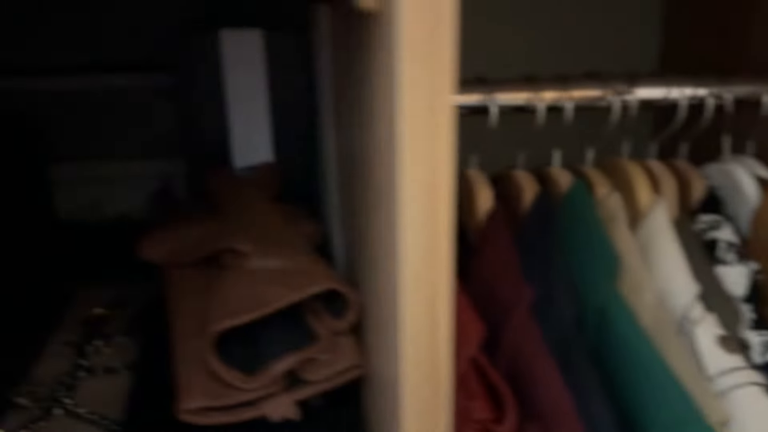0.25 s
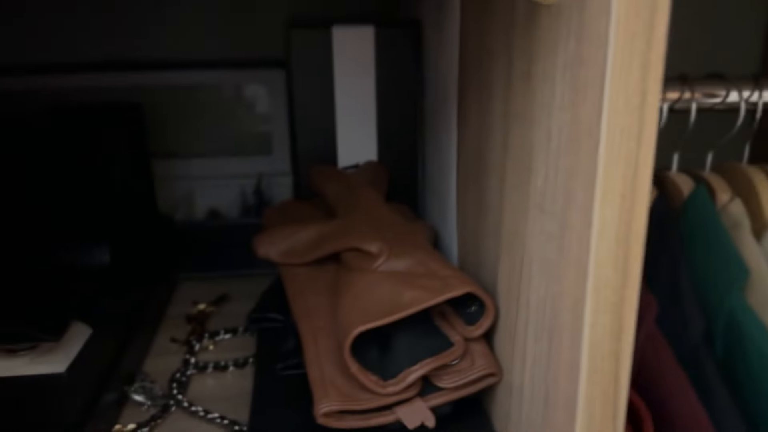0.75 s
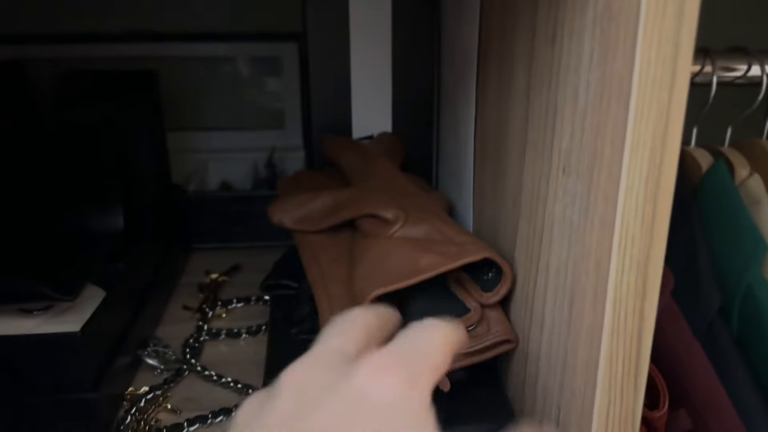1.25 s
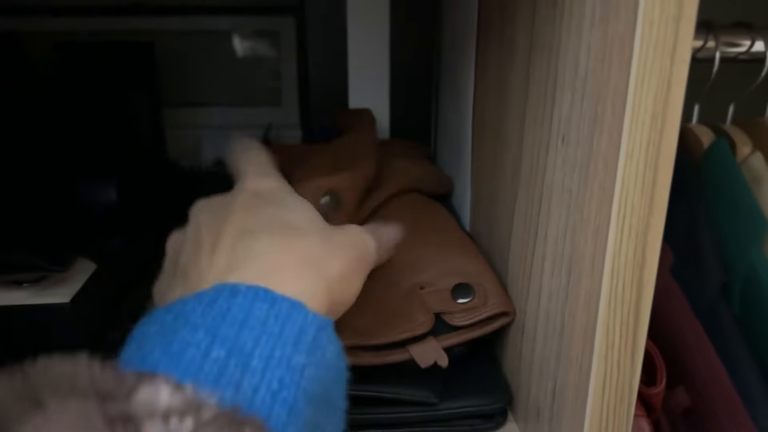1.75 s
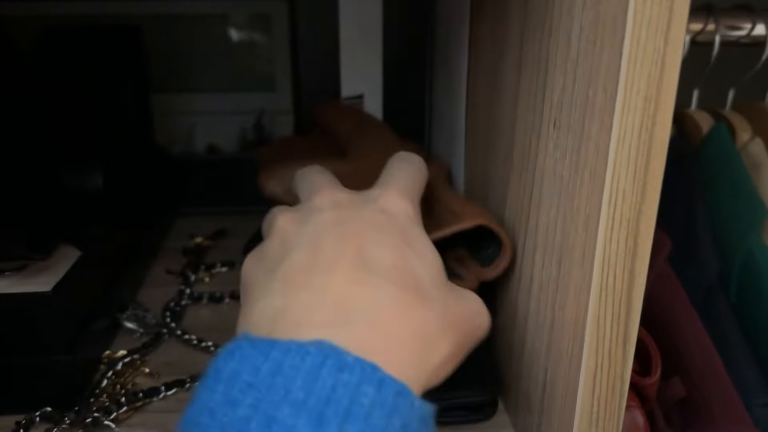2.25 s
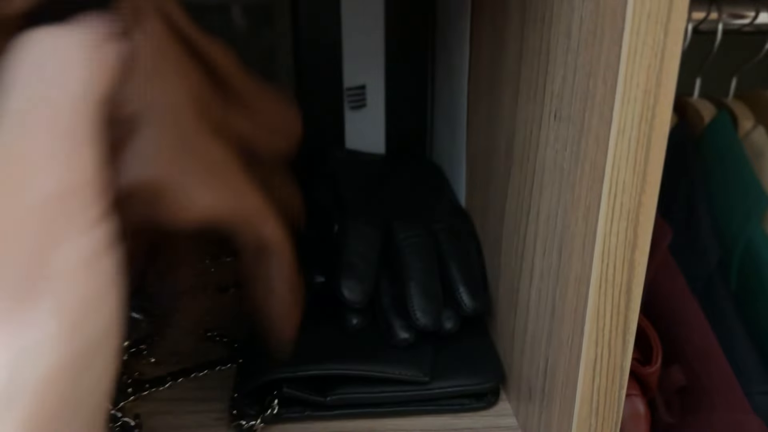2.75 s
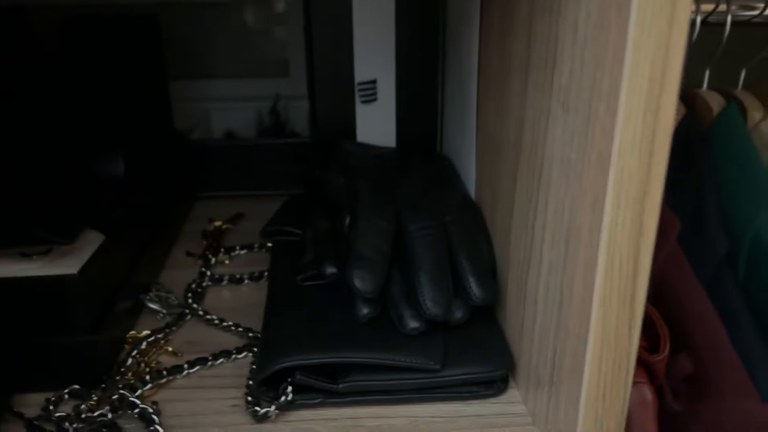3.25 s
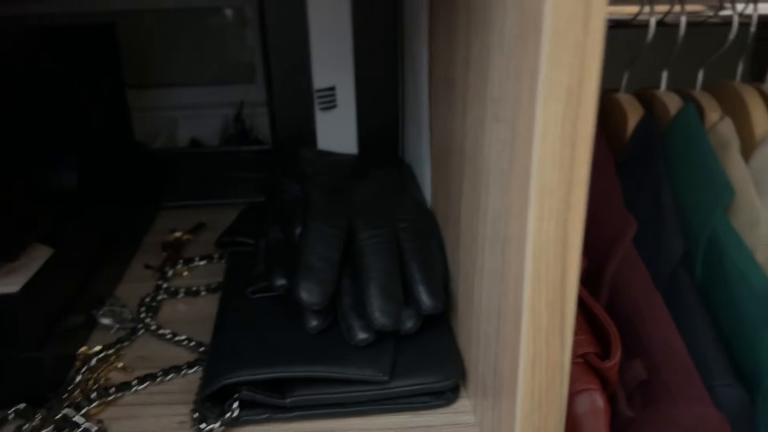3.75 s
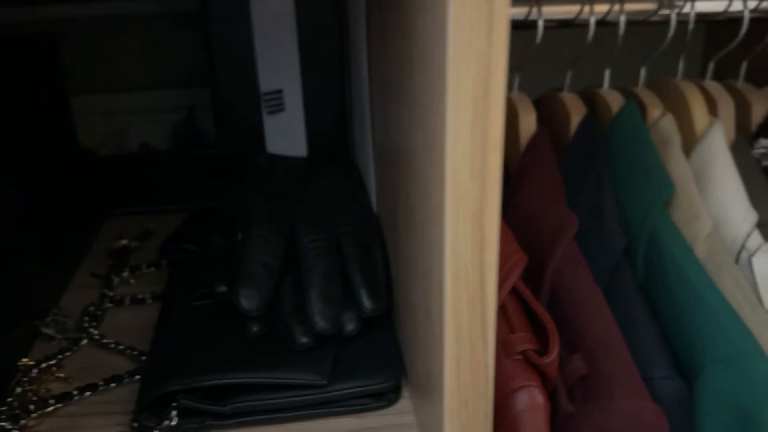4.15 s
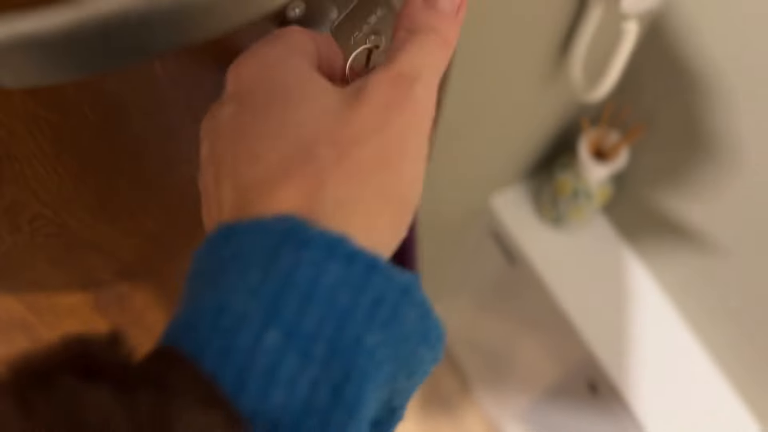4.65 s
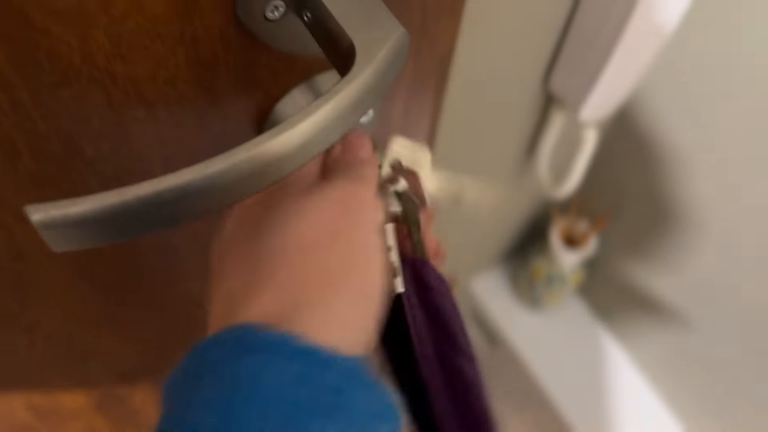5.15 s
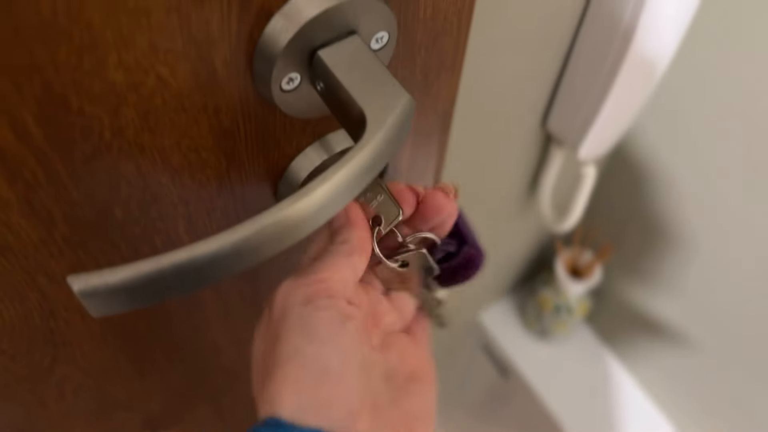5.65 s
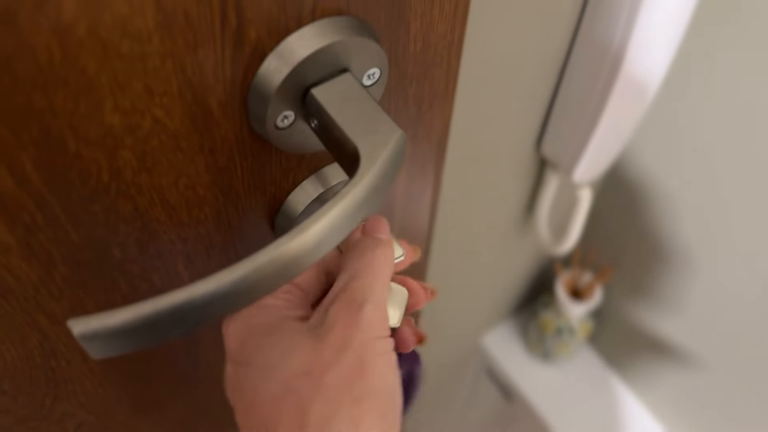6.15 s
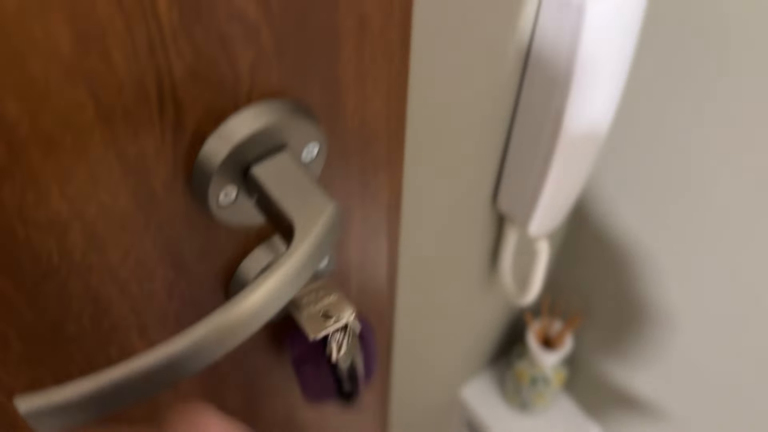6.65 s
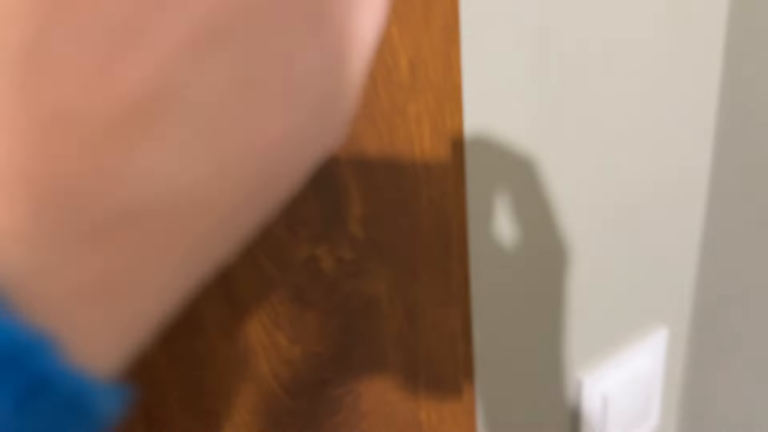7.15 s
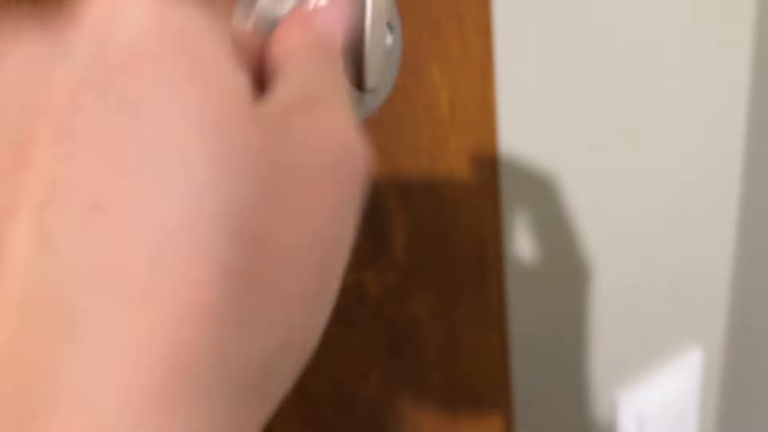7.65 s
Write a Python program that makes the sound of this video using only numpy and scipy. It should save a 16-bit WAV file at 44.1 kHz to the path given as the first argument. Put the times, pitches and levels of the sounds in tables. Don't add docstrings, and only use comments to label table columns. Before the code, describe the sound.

Close handheld stereo, indoors. From 0 to 0.9 s a wardrobe door rolls open with low, uneven rumble, rattling guide ticks and a jolt at 0.14, dying away as it stops. A faint ratchet ticks about eleven times a second from 0.9 to 2.1, fading. Leather rustles softly among small shelf knocks, brighter at 1.6; a sharp metal stud snaps at 2.09 and a short hard wood knock follows at 2.5. Rustling swells around 3.1, a scuff comes at 3.4, and the door rumbles shut from 3.8, growing until an abrupt cut at 4.48. In a lightly reverberant hallway, keys click from 4.65, then jangle densely and brightly between 5.05 and 5.65, with high ringing and brass rubbing. Sparser scrapes, clicks and door thuds follow; a bright clash at 6.5 leads to tiny spring pings until 6.8. Bolts clack from 7.1, strongest at 7.48, with final clicks near 7.85.

```python
import sys
import numpy as np
from scipy import signal
from scipy.fft import rfft, irfft, next_fast_len
from scipy.io import wavfile
from scipy.ndimage import uniform_filter1d, map_coordinates

SR = 44100
rng = np.random.default_rng(int(sys.argv[2]) if len(sys.argv) > 2 else 0)


def volts(x):
    e = np.asarray(x, float) / 20
    return 10 ** e


def file_out(sig):
    cols = np.atleast_2d(sig).T
    lim = np.clip(cols, -1, 1)
    pcm = np.round(lim * 32767).astype(np.int16)
    wavfile.write(sys.argv[1], SR, pcm)


N = 348831
T = np.arange(N) / SR
CUT_S = 4.475

# [f/Hz, level/dB, t60/s]
SHELF_TONES = [(102.2, -4.5, 0.24), (158.3, -1.5, 0.12), (288, -1.5, 0.045), (429, 8.5, 0.028),
               (880, 4, 0.013)]
# [f/Hz, level/dB, t60/s]
DOOR_TONES = [(76.8, -17.5, 0.6), (145.3, 0.5, 0.11), (278, -7.5, 0.38), (444, -3, 0.15), (590, -2, 0.084),
              (929, 7, 0.031)]
# [f/Hz, level/dB]
CRACK_COLOUR = [(200, -29.5), (900, -3), (2200, -3.5), (4000, 0.5), (6500, 0), (9500, 2), (12500, 4),
                (16000, -13)]
# [f/Hz, level/dB]
CLOTH_COLOUR = [(1200, -26), (2200, -2), (3500, -0.5), (6000, -8.5), (9500, -11.5), (16000, -27.5)]
# [f/Hz, level/dB]
BRASS_COLOUR = [(500, -46), (1200, -3), (2500, -5), (5000, -6.5), (8000, -5), (11000, -5), (13500, -27),
                (16000, -24)]
# [f/Hz, level/dB]
BODY_COLOUR = [(30, -33), (70, 5), (140, 0), (300, -2), (600, -6.5), (1200, -11.5), (2500, -38.5),
               (15000, -72)]


def unit(x):
    return x / np.sqrt(np.mean(x ** 2) + 1e-20)


def rise(t, rise_s):
    return 1 - np.exp(-t / rise_s)


def fade(t, t60):
    return volts(-60 * t / t60)


def along(points, hz, axis=1):
    p = np.transpose(points)
    return np.interp(np.log(hz + 1), np.log(p[0] + 1), p[axis])


def curve(*tables):
    return np.interp(T, *np.transpose(np.vstack(tables)))


def wobble(rate):
    return map_coordinates(rng.standard_normal(int(N * rate / SR) + 4), [T * rate])


def filtered(x, response):
    n = x.shape[-1]
    m = next_fast_len(n + 2048)
    return irfft(rfft(x, m) * response(np.fft.rfftfreq(m, 1 / SR)), m)[..., :n]


def noise(spectrum, grain_db, size=N):
    grain = volts(grain_db * rng.exponential(size=size))
    raw = rng.standard_normal((2, size)) * grain
    return unit(filtered(raw, lambda hz: volts(along(spectrum, hz))))


def ring(modes, scatter_db, t, damp=1, struck=False):
    hz, db, t60 = np.transpose(modes)[:, :, None]
    gain = volts(db + scatter_db * rng.standard_normal(hz.shape)) * fade(t, damp * t60)
    start = rng.random((2, len(hz), 1))
    if struck:
        start[0] = 0
    return (gain * np.sin(2 * np.pi * (hz * t + start))).sum(1)


def add(x, s, y):
    part = x[:, round(s * SR):][:, :y.shape[1]]
    part += y[:, :part.shape[1]]


def resonances(peaks):
    def response(f):
        total = 0
        for k, (centre, width, db) in enumerate(peaks):
            drag = 1j * f * width
            total = total + (-1) ** k * volts(db) * drag / (centre * centre - f * f + drag)
        return total
    return response


def knocks(rows, wood, crack_db, thud_db, ring_db, tilt, follow, body=None, body_db=0):
    out, t = np.zeros((2, N)), np.arange(SR // 7) / SR
    for s, db, low_db, t60, hz in rows:
        octave_db = tilt + follow * np.log2(hz / 1500)
        colour = [(f, g + octave_db * np.log2(f / 2000)) for f, g in CRACK_COLOUR]
        decay = fade(t, np.clip(t60, .01, .25)) * rise(t, 0.001) ** 2 * (1 + 1.44 * np.exp(-t / 0.0029))
        crack = volts(crack_db) * noise(colour, grain_db=1.6, size=len(t))
        crack = crack + volts(ring_db) * ring([(hz, 0, .06), (1.05 * hz, -3, .06)], 1, t)
        if body:
            seated = np.array(body) * rng.normal(1, [.04, 0, .2], (len(body), 3))
            crack = crack + volts(body_db) * ring(seated, 4, t)
        thud = volts(low_db + thud_db) * rise(t, 0.0039) ** 2 * ring(wood, 5.0, t)
        add(out, s, volts(db) * decay * crack + thud)
    return out


def slides(rows, surface):
    out, t = np.zeros((2, N)), np.arange(SR // 4) / SR
    for s, db, rise_s, t60 in rows:
        stroke = rise(t, rise_s) ** 2 * noise(surface, grain_db=1.5, size=len(t))
        add(out, s, volts(db) * fade(t, t60) * stroke)
    return out * volts(1.7 * wobble(80))


def hands(effort, surface, grain_db, stir_db, body_db, grows, snag_db):
    effort_db = curve(effort)
    stir = wobble(30)
    snags = snag_db * np.clip((effort_db + 65) / 10, 0, 1) * wobble(170)
    rustle = unit(volts(stir_db * stir + snags) * noise(surface, grain_db))
    body = unit(volts(3.0 * stir + 0.33 * wobble(37)) * noise(BODY_COLOUR, grain_db=0.5))
    return volts(effort_db + 2.5) * rustle + volts(grows * (effort_db + 59) + body_db) * body


def wardrobe_door():
    # [t/s, speed/dB]
    roll = [
        [(0.0, -36), (0.2, -36.5), (0.504, -42.5), (0.692, -54.5), (0.87, -72.5), (0.95, -81)],
        [(3.72, -60), (3.82, -55), (3.936, -45.5), (4.1, -40.5), (4.3, -39), (4.47, -35.5)],
    ]
    # [f/Hz, width/Hz, level/dB]
    panel = [(55.6, 21, -6), (81.9, 9.9, 4), (133.2, 17.5, -2.5), (218, 23, -14), (366.3, 31, -14)]
    # [f/Hz, level/dB]
    roller_colour = [(150, -48), (350, 21.5), (700, -9.5), (1300, 3.5), (2000, -28), (5000, -41),
                     (9000, -72), (16000, -92)]
    # [f/Hz, level/dB]
    swish_colour = [(1200, 4), (3000, 0.5), (6000, -11), (12000, -21)]
    speed_db = curve(roll[0], [(1.2, -101), (3.4, -106)], roll[1])
    bumps = wobble(28.04)
    rumble = unit(volts(2.5 * bumps) * filtered(rng.standard_normal((2, N)), resonances(panel)))
    rollers = unit(volts(1.4 * bumps + 0.9 * wobble(40)) * noise(roller_colour, grain_db=3.0))
    drag = unit(volts(0.88 * wobble(30)) * noise(BODY_COLOUR, grain_db=2.5))
    swish = volts(-32 + 2.9 * wobble(60)) * noise(swish_colour, grain_db=2.0)
    grip = volts(0.47 * (speed_db + 34.5))
    layers = rumble + grip * (volts(-11) * rollers + volts(-8.5) * drag)
    return volts(speed_db) * layers + volts(0.7 * speed_db) * swish


def door_guides():
    # [t/s, peak level/dB, ring f/Hz]
    chatter = [(0.0243, -45, 2240), (0.054, -45.5, 3930), (0.0935, -44.5, 3890), (0.1455, -37.5, 2730),
               (0.2635, -48, 3940), (0.289, -51, 3070), (0.3411, -62, 3240), (0.364, -56, 3880),
               (0.38, -52, 2960), (0.4274, -55.5, 3270), (0.455, -55, 3300), (0.4953, -63, 2980),
               (0.5302, -55, 2960), (0.5891, -53.5, 3640), (0.604, -51, 2900), (0.634, -48.5, 3130),
               (0.663, -49, 2920)]
    out, t = np.zeros((2, N)), np.arange(2000) / SR
    for s, db, hz in chatter:
        rattle = 0.405 * fade(t, 0.15) * noise(CLOTH_COLOUR, grain_db=-10, size=2000)
        add(out, s, volts(db) * rise(t, 0.00065) * (ring([(hz, 0, .035)], 0, t) + rattle))
    return out


def bare_wood_knocks():
    # [t/s, peak level/dB, thud level/dB, t60/s, ring f/Hz]
    stops = [
        (0.141, -38, -61, 0.1, 2390),
        (1.635, -34.5, -69, 0.033, 1000),
        (2.351, -50, -57, 0.14, 694),
        (2.517, -27, -43.5, 0.012, 840),
    ]
    return knocks(stops, SHELF_TONES, crack_db=-5.5, thud_db=-6.5, ring_db=-7.0, tilt=-9, follow=2.0)


def edge_scuffs():
    # [t/s, level/dB, rise/s, t60/s]
    scuffs = [
        (0.143, -40.5, 0.0014, 0.27),
        (3.434, -46, 0.0011, 0.34),
    ]
    # [f/Hz, level/dB]
    edge_colour = [(600, -14.5), (1500, -1), (2050, -1), (2450, -10), (3000, -0.5), (4500, -15),
                   (16000, -54)]
    return slides(scuffs, edge_colour)


def cloth_brushes():
    # [t/s, level/dB, rise/s, t60/s]
    brushes = [
        (.585, -60.5, 0.027, 0.65),
        (.805, -53.5, 0.0097, 0.26),
        (1.76, -59, 0.026, .4),
    ]
    return slides(brushes, CLOTH_COLOUR)


def leather_gloves():
    # [t/s, effort/dB]
    effort = [(0.79, -84), (1.2, -73), (1.5, -67), (1.95, -67.5), (2.31, -68), (2.61, -70), (2.9, -62.5),
              (3.05, -55.5), (3.14, -55), (3.21, -65.5), (3.36, -71.5), (3.62, -75.5), (4.4, -94)]
    # [f/Hz, level/dB]
    leather_colour = [(500, -14.5), (1200, -1), (2500, -5), (4500, -4), (8000, -4.5), (12000, -8.5),
                      (16000, -22.5)]
    return hands(effort, leather_colour, grain_db=-3.0, stir_db=2.0, body_db=-65.5, grows=0.57, snag_db=1.0)


def ratchet():
    # [f/Hz, level/dB, t60/s]
    pawl = [(2300, -5, .016), (2930, 0, .025), (3880, 3, .035)]
    # [t/s, level/dB]
    ticks = [
        (.885, -55.5),
        (1.5, -57),
        (2.1, -62.5),
    ]
    out, t = np.zeros((2, N)), np.arange(2000) / SR
    for s in ticks[0][0] + .0924 * np.arange(14):
        db = np.interp(s, *np.transpose(ticks)) + rng.normal(0, 1.0)
        scrape = 0.54 * fade(t, 0.23) * noise(CLOTH_COLOUR, grain_db=1.5, size=2000)
        add(out, s, volts(db) * (ring(pawl, 0.41, t) + scrape))
    return out


def shelf_contacts():
    # [t/s, peak level/dB, thud level/dB, t60/s, ring f/Hz]
    contacts = [(1.283, -53, -71, 0.29, 1300), (1.293, -53, -58.5, 0.041, 760),
                (1.374, -50.5, -63.5, 0.051, 760), (1.452, -67, -47.5, .15, 940),
                (1.553, -47.5, -74, 0.1, 1020), (1.573, -48, -61, 0.063, 810),
                (1.601, -52.5, -62, 0.27, 840), (2.079, -41, -49.5, 0.14, 610),
                (2.129, -45.5, -66, 0.28, 2150), (2.419, -59.5, -55, 0.27, 960),
                (2.754, -48.5, -61, 0.023, 1520), (3.138, -63, -58, 0.06, 4560),
                (3.399, -45.5, -64, 0.28, 3420), (3.434, -41.5, -63, 0.065, 2120),
                (3.5315, -61, -68, 0.099, 2540), (3.5614, -56.5, -66, 0.068, 2560)]
    return knocks(contacts, SHELF_TONES, crack_db=-1.0, thud_db=9.5, ring_db=-5, tilt=-5.5, follow=1.0)


def glove_stud():
    # [t/s, peak level/dB, thud level/dB, t60/s, ring f/Hz]
    hits = [
        (2.0705, -47, -64, 0.043, 4540),
        (2.085, -19, -59, 0.045, 3400),
        (2.0885, -26, -50.5, .04, 3550),
    ]
    # [f/Hz, level/dB, t60/s]
    stud = [(1270, -3, .05), (1607, 3, 0.059), (2260, -1.5, 0.055), (3540, -1, 0.025), (4330, 2, .03),
            (5300, -5, .04)]
    return knocks(hits, SHELF_TONES, crack_db=-5, thud_db=10.5, ring_db=-32, tilt=-5.0, follow=.9,
                  body=stud, body_db=-5)


def turning_hand():
    # [t/s, effort/dB]
    effort = [(4.6, -71.5), (4.7, -73), (4.83, -59.5), (4.9, -65.5), (5.02, -59), (5.14, -52),
              (5.24, -53.5), (5.42, -53.5), (5.48, -46.5), (5.62, -52), (5.76, -67.5), (6.05, -62.5),
              (6.25, -68.5), (6.45, -55.5), (6.79, -63.5), (7.05, -60), (7.3, -58), (7.8, -69.5)]
    return hands(effort, BRASS_COLOUR, grain_db=-2.0, stir_db=4.0, body_db=-57.5, grows=1.0, snag_db=3.0)


def key_contacts(key_tones):
    # [t/s, click level/dB]
    jangle = [(4.706, -37.5), (4.7289, -27), (4.77, -44), (4.8083, -38), (4.993, -40.5), (5.07, -28.5),
              (5.0749, -22), (5.1041, -29), (5.18, -32), (5.2076, -36), (5.224, -19.5), (5.3038, -28.5),
              (5.3303, -29.5), (5.342, -31), (5.3622, -49), (5.442, -45), (5.45, -31.5), (5.4757, -26),
              (5.4991, -14.5), (5.5844, -14), (5.635, -25), (5.641, -34), (5.958, -34.5), (5.9672, -24.5),
              (6.205, -50), (6.294, -37.5), (6.328, -30.5), (6.4124, -35), (6.4294, -29.5), (6.536, -16.5),
              (6.7048, -38)]
    # [t/s, click level/dB, thud level/dB]
    pins = [(4.647, -32.5, -41), (4.6553, -34.5, -39), (4.7835, -32.5, -37), (4.9223, -41.5, -48.5),
            (4.9484, -32, -56), (4.9993, -33.5, -41.5), (5.0556, -47, -33), (5.1667, -35, -39),
            (5.1742, -28, -35.5), (5.218, -25, -38.5), (5.251, -31, -50), (5.269, -16, -34),
            (5.502, -42.5, -29.5), (5.5571, -22.5, -36.5), (5.7812, -40, -40), (6.0114, -30, -39),
            (6.031, -32, -35), (6.0926, -38.5, -36), (6.1764, -42, -48), (6.278, -40, -39),
            (6.3938, -32, -75), (6.4416, -39, -41), (6.5283, -30, -51), (6.5914, -41, -71),
            (6.634, -36, -41), (6.659, -31, -88), (6.7833, -36.5, -83), (6.888, -34.5, -66)]
    muted_db = [-21, -24.5, -23, -50, -20, -24]
    out, t = np.zeros((2, N)), np.arange(SR // 9) / SR
    for s, db, low_db in [(s, db, db - 17.5) for s, db in jangle] + pins:
        octave_db = 0.35 * (low_db - db + 23.5)
        colour = [(f, g - octave_db * np.log2(f / 2000) + rng.normal(0, 4)) for f, g in CRACK_COLOUR]
        snap = fade(t, 0.024) * rise(t, 0.00069) ** 2 * (1 + 1.44 * np.exp(-t / 0.0012))
        click = volts(db - 6.5) * snap * noise(colour, grain_db=1.5, size=len(t))
        links = volts(db - 13) * ring(rng.uniform([1200, -9, .012], [10500, 0, .028], (9, 3)), 2, t)
        held = sum(volts(db + g) * ring(key, 4.1, t, damp=0.04) for g, key in zip(muted_db, key_tones))
        thud = volts(low_db - 11.5) * ring(DOOR_TONES, 1.45, t)
        add(out, s, click + rise(t, 0.00085) * (links + held + thud))
    return out


def free_keys(key_tones):
    # [t/s, level/dB, t60/s, free time/s]
    low_swings = [
        [(5.361, -40.5, 0.85, 0.1), (5.442, -29.5, 0.91, 0.038), (5.499, -25, 0.15, 0.019),
         (5.536, -37, .5, 0.019), (5.586, -31.5, .3, 0.03), (5.641, -20.5, 0.058, .02),
         (5.655, -44, 0.26, 0.11), (5.967, -53, .2, 0.055), (6.33, -31.5, 0.033, .03),
         (6.43, -36.5, 0.15, 0.095)],
        [(5.305, -38.5, .5, 0.018), (5.334, -33, 0.086, 0.028), (5.362, -33, 0.082, .02),
         (5.451, -27, 0.19, 0.017), (5.481, -39.5, 0.25, 0.033)],
        [(5.206, -37.5, .15, 0.028), (5.442, -31.5, 0.94, 0.068), (5.499, -32, .15, .04),
         (5.55, -47, .3, 0.027), (5.585, -25.5, .12, 0.055), (5.641, -16.5, 0.036, .02),
         (5.655, -46, 0.48, 0.13), (5.967, -28, 0.075, .07), (6.43, -37, 0.18, .07)],
    ]
    # [t/s, level/dB, t60/s, free time/s]
    high_swings = [
        [(4.76, -57, 0.63, 0.08), (4.8677, -57, 0.12, 0.018), (5.105, -31, 0.042, 0.028), (5.206, -45, .1, .02),
         (5.226, -32, .06, 0.018), (5.252, -47, .9, 0.064), (5.305, -39, .5, 0.031),
         (5.332, -27.5, 0.16, 0.024), (5.362, -27.5, 0.14, .07), (5.451, -27, 0.3, 0.077),
         (5.54, -43, .3, 0.038), (5.585, -35, .08, .03), (5.638, -23.5, 0.064, .03), (5.967, -49, .1, .02),
         (6.328, -40, 0.17, 0.083), (6.43, -37, 0.23, .04)],
        [(5.105, -45, 0.082, .03), (5.206, -26, .1, .03), (5.332, -17, 0.12, 0.027), (5.362, -23, 0.23, 0.054),
         (5.443, -24, 1, 0.08), (5.535, -27, 0.22, 0.037), (5.585, -34, .12, .04), (5.638, -18, 0.055, 0.018),
         (5.96, -37, .15, .025), (6.328, -22, 0.058, .04), (6.43, -31.5, .15, .06)],
        [(4.707, -50, 0.18, .1), (4.81, -59, .2, .1), (5.1817, -34, .15, .025), (5.206, -41, .15, 0.018),
         (5.224, -37, .12, .04), (5.305, -32, .5, .025), (5.3325, -12, .2, 0.0022), (5.3425, -6, 0.04, .012),
         (5.361, -24, 0.1, .07), (5.451, -22, .3, .07), (5.53, -39, .4, .05), (5.584, -46, .15, .03),
         (5.636, -30, 0.11, .1), (5.958, -30, 0.067, .1), (6.327, -36, 0.18, .08), (6.413, -32, .3, .02),
         (6.43, -22, 0.12, .08), (6.536, -30, .1, .08), (7.1, -55, .3, .05), (7.152, -51, 0.21, .09),
         (7.375, -57, 0.23, .06), (7.48, -31, 0.1, .09), (7.622, -65, 0.36, .08), (7.84, -63, .4, .07)],
    ]
    song, t = np.zeros((2, N)), np.arange(SR // 9) / SR
    for key, swings in zip(key_tones, low_swings + high_swings):
        twist = volts(2.2 * wobble(180))
        for s, db, t60, free_s in swings:
            touched = fade(np.maximum(t - free_s, 0), 0.028)
            swell = rise(t, .0016) * touched * np.resize(twist[round(s * SR):], len(t))
            add(song, s, volts(db) * swell * ring(key, 1.5, t, t60, struck=True))
    return song


def key_ring():
    # [f/Hz, level/dB, share of ring time]
    key_tones = [
        [(5614, 0, 1)],
        [(3343, -3, 1), (3520, -6, .7), (4030, -2, .6), (4900, -5, .6), (5150, -11, .5)],
        [(8303, 0, 1), (6966, -12, .6), (8480, -10, .5)],
        [(9123, 0, 1), (9441, -2, 1), (8969, -8, .7), (8720, -5, .8), (9290, -9, .5), (8600, -12, .5)],
        [(9805, -6, 1), (9960, -8, .6), (10250, -9, .5), (10700, -11, .5), (14550, -5, 1.2)],
        [(15447, -2, 1), (15495, -3, 1), (14550, -13, 1), (15340, -13, 1), (15600, -11, 1.2)],
    ]
    contacts, song = key_contacts(key_tones), free_keys(key_tones)
    hall_share = .3
    return contacts + hall_share * song, (1 - hall_share) * song


def key_slides():
    # [t/s, level/dB, rise/s, t60/s]
    strokes = [
        (4.775, -41, 0.0098, 0.11),
        (6.005, -39, 0.004, 0.17),
        (7.385, -58, 0.01, 0.067),
    ]
    return slides(strokes, BRASS_COLOUR)


def lock_bolts():
    # [t/s, peak level/dB, thud level/dB, t60/s, ring f/Hz]
    bolts = [(5.881, -41, -47, 0.054, 705), (5.903, -36.5, -41, 0.031, 573), (6.123, -33, -45, 0.046, 1050),
             (6.196, -33, -43, 0.1, 596), (7.099, -22.5, -41.5, 0.076, 1900),
             (7.134, -46, -44.5, 0.017, 2400), (7.151, -20.5, -65, 0.073, 2260),
             (7.239, -32, -49, 0.078, 2950), (7.274, -38, -56, 0.3, 900), (7.293, -38, -42, 0.028, 3970),
             (7.3745, -25.5, -40.5, 0.13, 2050), (7.388, -26.5, -38, 0.13, 2170),
             (7.4494, -32, -44.5, 0.29, 1400), (7.476, -23, -60, .05, 1510),
             (7.48, -10, -36.5, 0.077, 6480), (7.488, -21.5, -39, 0.19, 2380), (7.585, -38, -60, 0.38, 520),
             (7.622, -38.5, -66, 0.05, 5900), (7.68, -46.5, -55, 0.071, 1060),
             (7.8355, -29.5, -52, 0.053, 2210), (7.85, -34.5, -57, 0.065, 8900),
             (7.857, -24.5, -45.5, 0.068, 1570), (7.862, -31, -59, 0.033, 6090)]
    # [f/Hz, level/dB, t60/s]
    lock_case = [(1610, -2, 0.044), (2200, -1, 0.049), (2820, -3, 0.066), (4125, -2, 0.044),
                 (6090, 1, 0.05), (7000, -9, 0.029), (8900, -5.5, 0.04)]
    return knocks(bolts, DOOR_TONES, crack_db=-10.0, thud_db=0.5, ring_db=-11.5, tilt=-7, follow=1.4,
                  body=lock_case, body_db=-14)


def lock_spring():
    # [t/s, level/dB]
    pings = [
        (6.589, -38),
        (6.632, -39),
        (6.708, -35),
        (6.73, -37),
        (6.816, -43.5),
    ]
    out, t = np.zeros((2, N)), np.arange(2000) / SR
    for s, db in pings:
        add(out, s, volts(db) * rise(t, 0.0014) * ring([(1795, -2.5, 0.027), (1900, -20, .03)], 0, t))
    return out


def room(x, decays, wet_db):
    hz, _, z = signal.stft(x[0], SR, nperseg=256)
    keep = volts(-120 * 128 / SR / along(decays, hz))
    power = np.array([signal.lfilter([0, 0, 1 - k], [1, -k], p) for k, p in zip(keep, np.abs(z) ** 2)])
    fresh = signal.stft(rng.standard_normal((2, N)), SR, nperseg=256)[2]
    tail = signal.istft(np.sqrt(power) * fresh / np.std(fresh), SR, nperseg=256)[1][:, :N]
    return x + volts(wet_db) * tail


def ports(pair, table, pan=1):
    side = np.array([[1], [-1]])

    def turn(hz):
        return np.arccos(np.clip(along(table, hz), 0, 1)) / 2

    def lean(hz):
        level = volts(pan * side * along(table, hz, axis=3) / 2)
        return level * np.exp(-.5j * side * along(table, hz, axis=2))

    shared = filtered(pair[0], lambda hz: lean(hz) * np.cos(turn(hz)))
    return shared + filtered(pair[1], lambda hz: side * lean(hz) * np.sin(turn(hz)))


def thin_treble(x, mid_db, side_db, faint_db, attack_db):
    hz, _, z = signal.stft([x[0] + x[1], x[0] - x[1]], SR, nperseg=1024)
    bands = np.abs(z[:, :512]).reshape(2, 32, 16, -1) ** 2
    mood = volts(14 * uniform_filter1d(rng.standard_normal(bands[:, :, 0].shape), size=10, axis=-1))
    power = mood * np.abs(uniform_filter1d(bands.mean(2), size=3, axis=-1))
    power = np.pad(np.repeat(power, 16, axis=1), [(0, 0), (0, 1), (0, 0)])
    hz = hz[:, None]
    whole = power[:, 40:200].mean((0, 1))
    top = bands[:, 12:].mean((0, 1, 2))
    steady = top < volts(2 * attack_db) * np.roll(top, 1)
    faint = (hz > 9600) & (power < volts(2 * faint_db) * whole) | (hz > 15900)
    weak_mid = (hz > 9600) & (power[0] < volts(2 * mid_db) * power[1])
    weak_side = (hz > 1800) & (power[1] < volts(2 * side_db) * power[0])
    dropped = steady & (faint | np.array([weak_mid, weak_side]))
    mid, side = signal.istft(z * ~dropped, SR, nperseg=1024)[1][:, :N]
    return np.array([mid + side, mid - side]) / 2


def scene():
    # [f/Hz, t60/s]
    bedroom = [(200, 0.068), (2000, 0.47), (10000, 0.034)]
    hall = [(200, 0.47), (2000, 0.17), (10000, 0.17)]
    # [f/Hz, likeness, left lag/rad, left-right level/dB]
    shelf_ports = [(60, .96, 0, 0), (600, .52, -.5, 4.5), (1400, .55, -3, 3), (2400, .4, -6.3, 0),
                   (5500, .2, -9, 3), (7800, .65, -9.5, 6), (11000, .83, -9.3, 0), (15500, .8, -6.3, 0)]
    door_ports = [(100, .98, 0, 0), (800, .5, .9, -2), (2200, .35, .3, 0), (5000, .3, .7, 0),
                  (6600, .95, .2, 0), (9200, .88, 1.6, 0), (10800, .97, 2.8, 0), (14000, .97, 3.5, 0),
                  (15500, .92, 4.3, 0)]
    # [f/Hz, level/dB]
    hum_colour = [(25, -20), (50, 7), (120, -1.5), (300, -50), (1000, -10), (3000, -17.5), (8000, -44),
                  (16000, -52)]
    hiss_colour = [(300, -9), (1500, -2), (6000, 0.5), (16000, -3)]
    hum = noise(hum_colour, grain_db=1)

    hits = bare_wood_knocks() + edge_scuffs() + cloth_brushes() + ratchet() + shelf_contacts() + glove_stud()
    shelf = room(hits, bedroom, wet_db=-10) + leather_gloves()
    rolling = wardrobe_door() + door_guides() + volts(-68) * hum
    before = ports(shelf, shelf_ports) + ports(rolling, shelf_ports, pan=0)

    jangle, song = key_ring()
    lock = jangle + key_slides() + lock_bolts() + lock_spring()
    door = room(lock, hall, wet_db=-4.0) + song + turning_hand()
    air = volts(-76.0) * hum + volts(-69.5) * noise(hiss_colour, grain_db=0)
    return np.where(T < CUT_S, before, ports(door + air, door_ports))


def top_cut(x):
    return signal.sosfilt(signal.butter(12, 16970, fs=SR, output="sos"), x)


def record(dry):
    thin = thin_treble(dry, mid_db=-8.5, side_db=-9, faint_db=-17.5, attack_db=8.5)
    return top_cut(thin)


dry = scene()
out = record(dry)
file_out(out)
```